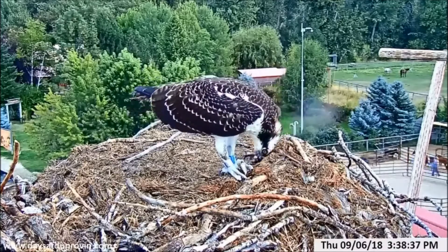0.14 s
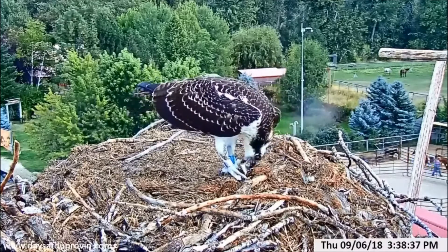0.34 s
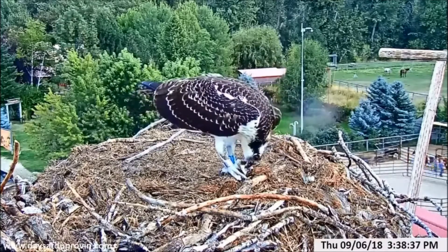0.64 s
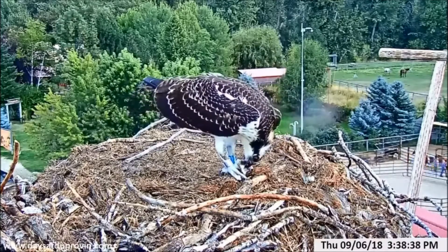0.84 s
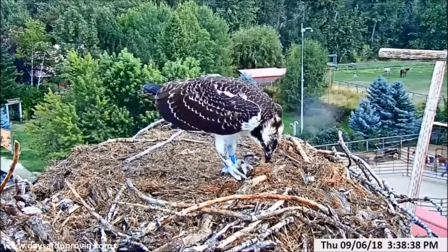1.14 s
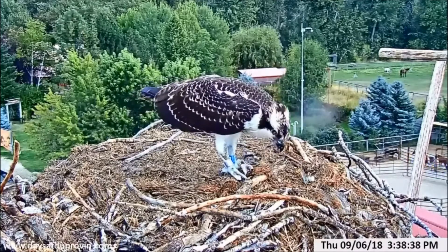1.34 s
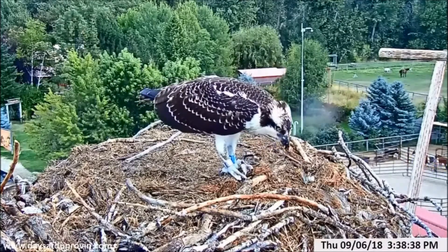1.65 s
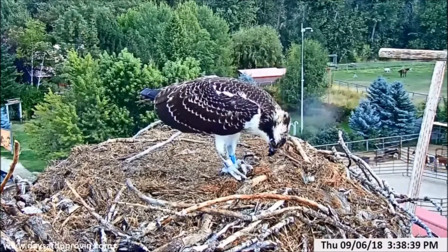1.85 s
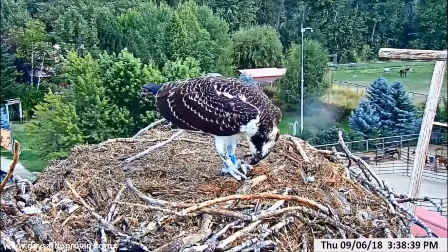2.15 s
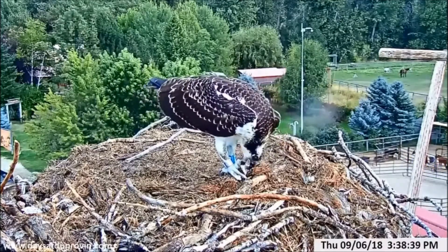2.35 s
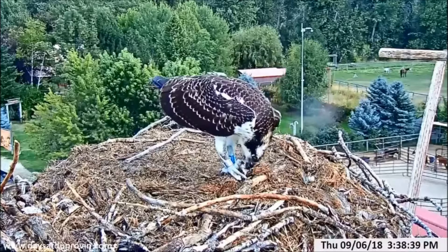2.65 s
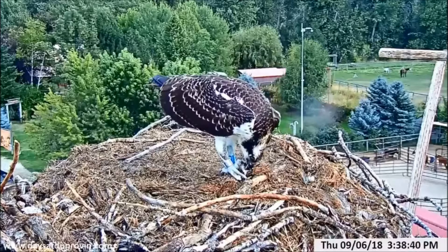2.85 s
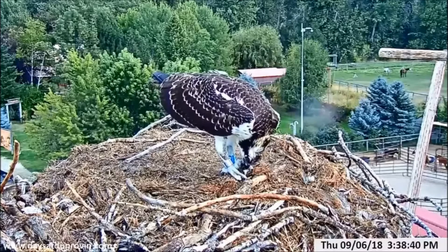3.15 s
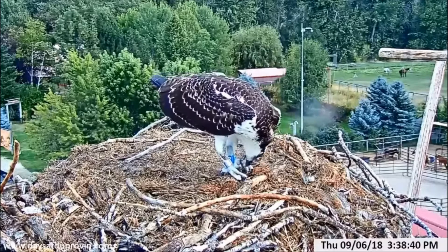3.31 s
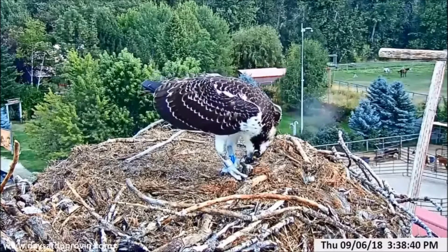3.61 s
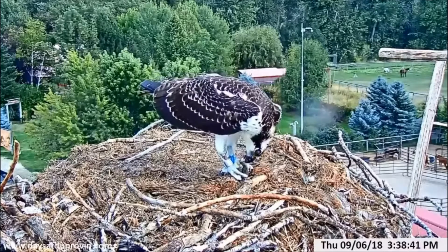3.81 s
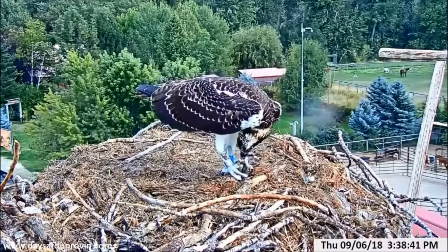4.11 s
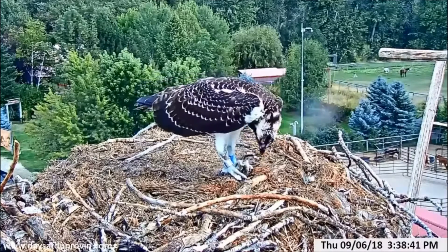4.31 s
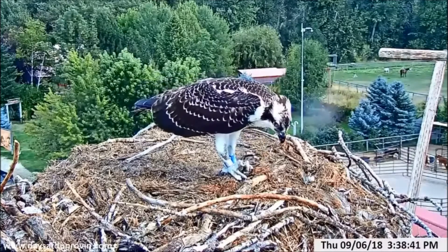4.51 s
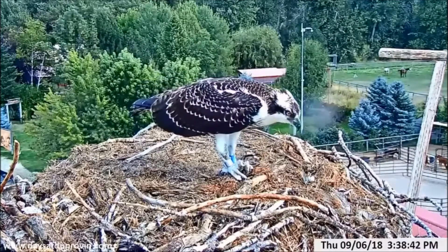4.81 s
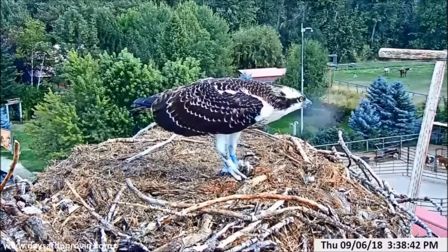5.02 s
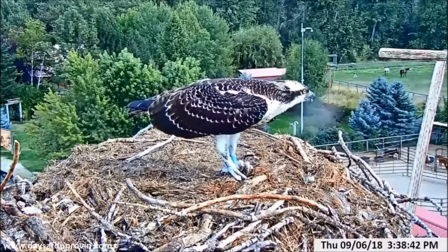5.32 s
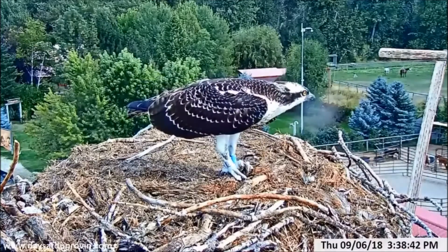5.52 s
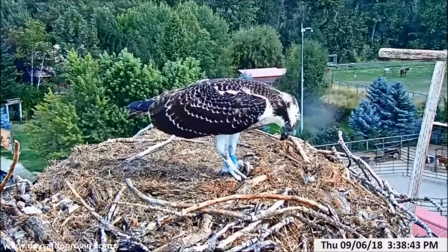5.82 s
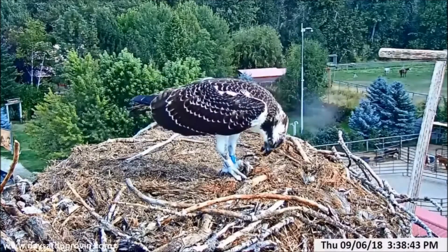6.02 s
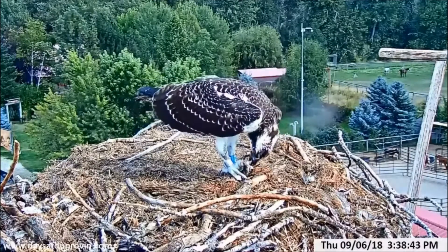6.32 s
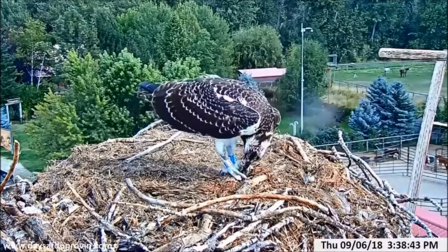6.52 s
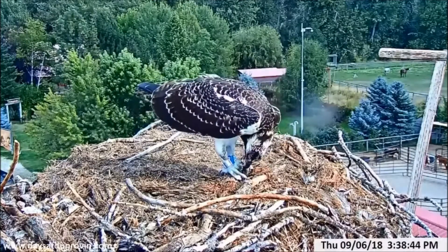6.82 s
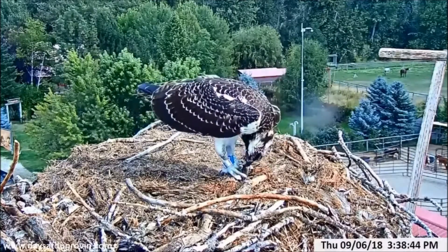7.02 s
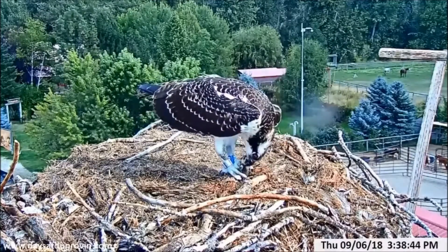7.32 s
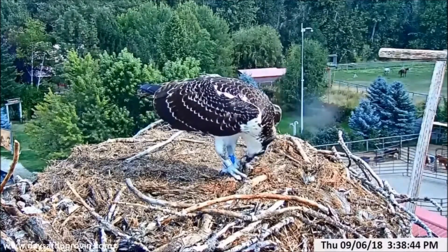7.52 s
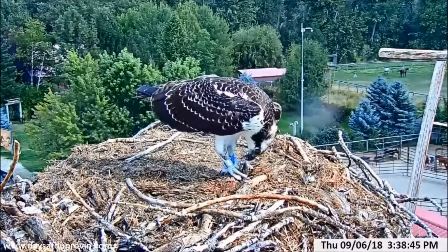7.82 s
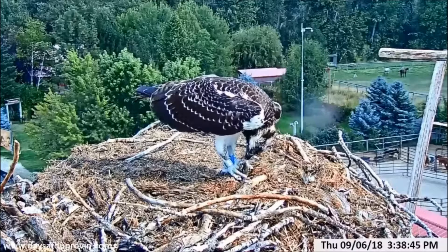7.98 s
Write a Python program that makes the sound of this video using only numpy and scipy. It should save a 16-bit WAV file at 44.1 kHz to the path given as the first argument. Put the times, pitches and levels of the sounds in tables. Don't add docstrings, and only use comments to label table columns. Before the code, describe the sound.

An osprey on its nest gives three bursts of piercing, rapid chirps, close and loud, over a faint outdoor valley hush.

```python
import sys
import numpy as np
from scipy import signal
from scipy.fft import rfft, irfft, next_fast_len
from scipy.io import wavfile
from scipy.ndimage import map_coordinates

SR = 44100
rng = np.random.default_rng(int(sys.argv[2]) if len(sys.argv) > 2 else 0)


def log_audio(samples):
    frames = np.atleast_2d(samples).T
    limited = np.clip(frames, -1, 1)
    pcm = np.round(limited * 32767).astype(np.int16)
    wavfile.write(sys.argv[1], SR, pcm)


def rack_gain(trim_db):
    fader = np.asarray(trim_db, float)
    return 10 ** (fader / 20)


N = 359415


def unit(x):
    return x / np.sqrt(np.mean(x ** 2) + 1e-20)


def along(points, hz):
    point_hz, value = np.transpose(points)
    return np.interp(np.log(hz + 1), np.log(point_hz + 1), value)


def coloured(x, spectrum):
    m = next_fast_len(x.shape[-1] + 8192)
    gain = rack_gain(along(spectrum, np.fft.rfftfreq(m, 1 / SR)))
    return irfft(rfft(x, m) * gain, m)[..., :x.shape[-1]]


def noise(spectrum):
    return unit(coloured(rng.standard_normal(N), spectrum))


def wobble(rate):
    knots = rng.standard_normal(int(N * rate / SR) + 4)
    return map_coordinates(knots, [np.arange(N) * rate / SR])


def add(track, s, piece):
    room = track[round(s * SR):][:len(piece)]
    room += piece[:len(room)]


BREAKS_UP_S = [.466, 2.695, 3.386, 6.104, 6.395, 6.611, 6.802, 7.138, 7.612]
BREAKS_DOWN_S = [.539, 2.355, 2.508, 2.764, 2.989, 3.426, 5.85, 6.247, 6.445, 6.656, 6.96, 7.643]
# pitch_ratio, level_db, loss_db per kHz of slack, upward_bend (share of pitch) before a break up
REGISTERS = [
    (1, 0.5, 4.5, .015),
    (1.335, 0, 15.5, .11),
    (1.94, -0.1, 4, 0),
]
# doubling_db, quarter_lines_db under doubling, rasp_db, bright_db
REGISTER_VOICE = [
    (-11, -21.5, -11.5, -2),
    (2, -10.5, 1, -1.5),
    (-1.5, -7, -6.8, 5.5),
]
SOFT_STARTS_S = [.43, 2.26, 2.49]
HIGH_FROM_HZ = 2000
RISE_POWER, SAG_SETS_IN_S, FALL_S = 1.7, .02, .017
END_HZ, END_FOLLOWS = 1573.4, .4
HELD_END_HZ_PER_S = 700
ATTACK_DB, ATTACK_S, SOFT_ATTACK_S = 25.5, .0017, .011
RELEASE_DB, RELEASE_S = 23.5, .005
UP_DIP_DB, DOWN_DIP_DB, DIP_S = 3.5, 9, .0035
SLIP, BEND_S = .035, .0062
TOP_BREAK = .27
LATE_BREAK_S, EARLY_DIP = .027, .15


def chirp(start, top, end, top_hz, db, first_hz, sag_hz_per_s):
    i = np.arange(round(start * SR), round(end * SR))
    t = i / SR
    ups = [s for s in BREAKS_UP_S if start < s < end]
    downs = [s for s in BREAKS_DOWN_S if start < s < end]
    register = (first_hz > HIGH_FROM_HZ) + np.searchsorted(ups, t) - np.searchsorted(downs, t)
    ratio, level_db, effort_db, push = np.transpose(REGISTERS)[:, register]

    to_climb = np.clip((top - t) / (top - start + 1e-4), 0, 1)
    rise = (top_hz - first_hz / ratio[0]) * to_climb ** RISE_POWER
    after = np.maximum(t - top, 0)
    sag = sag_hz_per_s * after ** 2 / (after + SAG_SETS_IN_S)
    drop_hz = top_hz - END_HZ - END_FOLLOWS * (top_hz - 2000) - sag[-1]
    drop_hz -= HELD_END_HZ_PER_S * (end - top) * register[-1]
    early = np.exp((top - end) / FALL_S)
    fall = np.maximum(np.exp((t - end) / FALL_S) - early, 0) / (1 - early)
    slack = rise + sag + drop_hz * fall
    hz = (top_hz - slack) * ratio

    soft = np.abs(start - np.array(SOFT_STARTS_S)).min() < .01
    attack_s = SOFT_ATTACK_S if soft else ATTACK_S
    level_db = level_db + db - effort_db * slack / 1000
    level_db -= ATTACK_DB * np.exp((start - t) / attack_s) * (start > .01)
    level_db -= RELEASE_DB * np.exp((t - end) / RELEASE_S)

    share = TOP_BREAK if register.max() > 1 else 1
    for dip_db, bend, breaks in ((UP_DIP_DB, push, ups), (DOWN_DIP_DB, -share * SLIP, downs)):
        for s in breaks:
            early_break = s in downs and end - s > LATE_BREAK_S
            depth = share * (EARLY_DIP if early_break else 1)
            level_db -= depth * dip_db * np.exp(-((t - s) / DIP_S) ** 2)
            hz *= 1 + bend * (t < s) * np.exp(-np.abs(t - s) / BEND_S)
    to_edge = np.abs(t[:, None] - [start, end, *ups, *downs]).min(axis=1)
    return i, hz, level_db, to_edge, np.transpose(REGISTER_VOICE)[:, register]


# start_s, top_s, end_s, top_hz (as low-register pitch),
# level_db
CHIRPS = [
    (0, 0.013, .023, 1650, -23.5),
    (0.017, 0.082, .124, 1905, -17),
    (0.206, 0.243, .292, 1811, -17.5),
    (0.428, 0.458, .549, 1892, -24.5),
    (0.745, 0.757, .786, 1625, -49),
    (0.785, .792, .83, 2080, -58.5),
    (0.835, 0.85, .907, 1660, -50.5),
          (2.26, 2.343, 2.398, 1925, -20), (2.47, 2.491, 2.488, 2020, -39.5),
                (2.486, 2.512, 2.542, 1810, -20), (2.646, 2.698, 2.781, 2035, -17.5),
                (2.885, 2.942, 3.006, 2030, -18), (3.144, 3.195, 3.243, 1941, -22),
                (3.334, 3.376, 3.447, 1890, -23), (3.547, 3.595, 3.654, 2030, -18),
                (3.771, 3.816, 3.868, 2013, -20), (3.969, 4.033, 4.077, 1927, -22),
                (4.177, 4.219, 4.264, 1842, -23.5),
          (5.744, 5.755, 5.761, 1857, -43),
    (5.758, 5.814, 5.867, 2047, -15.5),
    (5.929, 5.97, 6.022, 2094, -16.5),
    (6.078, 6.107, 6.263, 2059, -16.5),
    (6.357, 6.395, 6.463, 2030, -16.5),
    (6.569, 6.61, 6.674, 1947, -17),
    (6.772, 6.802, 6.974, 2042, -16.5),
    (7.109, 7.138, 7.302, 2067, -15.5),
    (7.45, 7.482, 7.672, 1898, -23),
]
ARCHES = CHIRPS
# first_hz, sag_hz_per_s, doubling_db, rasp_db, bright_db
CHIRP_VOICES = [(2030, 1000, -26.5, -26, -50), (1808, 6100, -3.5, -9.5, -17), (1665, 8900, -11.5, -19, -14),
                (1556, 1800, -33, -29, -29), (1650, 830, -5, -3, -30), (2790, 8000, -15, -9, -24),
                (1709, 380, -16, -3.5, -33),
                (2490, 7300, -27.5, -27.5, -16.5), (1750, 900, -6, -9.5, -44),
                (2380, 4000, -24.5, -18, -17), (1794, 3500, -25.5, -17, -15.5),
                (2180, 5500, -26.5, -20.5, -15), (2336, 3000, -16.5, -16.5, -19),
                (2250, 900, -19.5, -15.5, -17.5), (2535, 2500, -14, -18.5, -16.5),
                (2370, 4400, -17, -19.5, -16), (2340, 3200, -13.5, -10, -17.5), (2350, 1700, -14, -12, -17),
                (1660, 1000, -23.5, -7, -40), (2280, 3000, -29.5, -23, -14), (1660, 6600, -31.5, -25, -15),
               (1660, 41, -35, -21.5, -14.5), (1830, 3000, -32.5, -22, -12), (1711, 7400, -21, -21, -12.5),
               (1730, 800, -25.5, -17, -14.5), (1719, 970, -18, -19.5, -15), (2350, 60, -17.5, -17, -15.5)]
VOICES = CHIRP_VOICES
# pitch_hz, level_db
OCTAVE = [(1550, 6.5), (1780, 4), (1900, -1.4), (2060, -11.5), (2400, -17.5), (2560, -27.5), (2750, -31),
          (3600, -22.5)]
# freq_hz, level_db
OVERTONES = [(4500, -16), (5500, -20.5), (6500, -19.5), (7300, -1), (8200, -1), (9500, -1.5), (11000, -4.5),
             (11800, -28.5), (12300, -69)]
# freq_hz, level_db
THROAT = [(60, -42.5), (170, 4.5), (420, -20.5), (800, -13), (1400, -10), (1850, -3.5), (2400, 1),
          (3300, 3), (4000, -15), (5000, -26.5), (6600, -45.5)]
# freq_hz, level_db
BEAK = [(5000, -39.5), (6600, -21), (7900, 4), (10700, -5), (11700, -23.5), (12300, -58.5)]
# freq_hz, level_db
FLUTTER = [(150, -15.5), (500, -11), (780, 2), (1150, -16.5), (2500, -25.5), (5000, -51.5)]
FAINT_DB, OCTAVE_FADES = -18.5, .47
RASP_GROWS_DB, RASP_LIMIT_DB = .5, -13


def osprey(jitter=.002, edge_s=.0007, strain=1.5, beak_db=6, breath_db=-5):
    out = np.zeros(N)
    gusts = rack_gain(2 * wobble(45))
    breath, hiss, flutter = [noise(colour) * gusts for colour in (THROAT, BEAK, FLUTTER)]
    unsteady, doubling, patchy_db = wobble(400), wobble(35), 3.3 * wobble(30)
    for arch, (first_hz, sag, half_db, rasp_db, bright_db) in zip(ARCHES, VOICES):
        i, hz, level_db, to_edge, register_voice = chirp(*arch, first_hz, sag)
        more_half_db, under_db, more_rasp_db, more_bright_db = register_voice
        half_db = half_db + more_half_db
        quarter_db = half_db + under_db
        octave_db = along(OCTAVE, hz) + OCTAVE_FADES * min(arch[-1] - FAINT_DB, 0)
        rasp_db = rasp_db + more_rasp_db + RASP_GROWS_DB * np.linspace(-1, 1, len(i)) + patchy_db[i]
        rasp = rack_gain(np.minimum(rasp_db, RASP_LIMIT_DB))
        shake = rasp * flutter[i]
        shine_db = bright_db + more_bright_db + strain * (level_db - level_db.max())

        phase = 2 * np.pi * np.cumsum(hz * (1 + jitter * unsteady[i])) / SR
        octave = rack_gain(octave_db)
        tone = np.sin(phase) + octave * np.sin(2 * phase + 1 + 1.7 * shake)
        tone /= np.hypot(1, octave)
        for k in range(3, 8):
            tone += rack_gain(shine_db + along(OVERTONES, k * hz)) * np.sin(k * phase + k * k + shake)

        phase += shake
        tone += shake * (np.cos(phase) + .15)
        swing_db = 3.2 * doubling[i]
        tone /= np.hypot(1, 1.4 * rack_gain(half_db + swing_db))
        for q in range(1, 28):
            if q % 4 == 0:
                continue
            line_hz = q / 4 * hz
            gain = rack_gain(along(THROAT, line_hz)) + rack_gain(along(BEAK, line_hz) + shine_db + beak_db)
            gain *= rack_gain((quarter_db if q % 2 else half_db) + swing_db)
            tone += gain * np.sin(q / 4 * phase + q * q)

        air = rasp * (rack_gain(breath_db) * breath[i] + rack_gain(shine_db + 13) * hiss[i])
        fade = np.clip(to_edge / edge_s, 0, 1)
        out[i] += fade * rack_gain(level_db) * (np.sqrt(2) * tone + air)
    return out


# delay_s, level_db
WALLS = [
    (0.063, -31.5),
    (.118, -28),
    (.148, -44.5),
]
# freq_hz, t60_s
TREES = [(500, 0.34), (2500, 1.4), (5000, 2.6), (10000, 0.14)]
# freq_hz, gain_db
DISTANCE = [(300, 7), (2000, -3.5), (4500, -7), (6500, -16), (12000, -48)]


def echoes(x, trees_db=-35, blur_s=.04):
    hz, t, z = signal.stft(rng.standard_normal(SR), SR, nperseg=256)
    decay = rack_gain(-60 * t / along(TREES, hz)[:, None])
    tail = signal.istft(z * decay, SR, nperseg=256)[1][:SR]
    answer = rack_gain(trees_db) * tail / np.linalg.norm(tail)
    t = np.arange(SR // 10) / SR
    for delay, db in WALLS:
        scatter = rng.standard_normal(len(t)) * np.exp(-t / blur_s)
        add(answer, delay, rack_gain(db) * scatter / np.linalg.norm(scatter))
    return coloured(signal.fftconvolve(x, answer)[:N], DISTANCE)


# time_s, level_db
VALLEY = [(0, -56.5), (.65, -73.5), (2.9, -71.5), (3.4, -65.5), (4.2, -72), (5.8, -75), (6.15, -62),
          (6.75, -63), (7.0, -64), (8.15, -74)]
# freq_hz, density_db (per Hz)
DRONE = [(60, -40.5), (113, -7), (146, -9.5), (180, -2.5), (260, -4), (420, -18.5), (600, -47.5)]
# freq_hz, density_db (per Hz)
AIR = [(300, -21), (430, -16), (650, -7), (850, 0.5), (1450, 0), (2200, -8.5), (2700, -3), (3300, -14),
       (4600, -21.5), (8000, -25), (12000, -32.5)]
# centre_s, half_width_s, level_db
HUMS = [
    (3.4, .25, -83),
    (6.5, 0.24, -55.5),
]
DRONE_DB, DRONE_GROWS, AIR_DB = 1.5, 1.1, 4.5


def valley():
    t = np.arange(N) / SR
    loud_db = np.interp(t, *np.transpose(VALLEY))
    mean_db = loud_db.mean()
    drone_db = mean_db + DRONE_DB + DRONE_GROWS * (loud_db - mean_db)
    drone = noise(DRONE) * rack_gain(drone_db + 1.5 * wobble(12))
    air = noise(AIR) * rack_gain(loud_db + AIR_DB + 1.9 * wobble(30))
    passing = sum(rack_gain(db) * np.exp(-((t - s) / half) ** 4) for s, half, db in HUMS)
    hum = np.sin(2 * np.pi * 177 * t + .8 * wobble(15)) * passing * rack_gain(2 * wobble(14))
    return drone + air + hum


def jolts(below_db=-23):
    out, t = np.zeros(N), np.arange(SR // 10) / SR
    ring = np.sin(2 * np.pi * 172 * t) * rack_gain(-60 * t / .07)
    ring += 1.5 * np.sin(2 * np.pi * 620 * t) * rack_gain(-60 * t / .02)
    for start, top, end, top_hz, db in ARCHES:
        for s in BREAKS_UP_S:
            if start < s < end:
                add(out, s, rack_gain(db + below_db) * ring)
    return out


# time_s, peak_db, pitch_hz
TWIGS = [
    (0.771, -42.5, 4400),
    (1.744, -54.5, 3300),
    (7.885, -59, 3300),
    (8.0, -51, 2990),
    (8.02, -57, 3500),
]


def twigs():
    out, t = np.zeros(N), np.arange(SR // 50) / SR
    for s, db, hz in TWIGS:
        ping = np.sin(2 * np.pi * hz * t) + .18 * rng.standard_normal(len(t))
        add(out, s, rack_gain(db - 60 * t / .015) * ping)
    return out


# start_s, length_s, pitch_hz, level_db
CAWS = [
    (1.5, 0.15, 418, -64.5),
    (1.83, 0.13, 420, -69.5),
    (4.61, 0.13, 426, -64),
    (4.92, 0.15, 409, -68.5),
    (7.72, 0.067, 425, -65.5),
]
# freq_hz, level_db
CROW = [(400, -37), (860, 9), (1300, 2), (1700, -6), (2150, 10.5), (2700, -18), (3500, -22)]


def crow():
    out = np.zeros(N)
    for s, length, hz, db in CAWS:
        u = np.linspace(0, 1, round(length * SR))
        bend = 1 - .25 * (u - .5) ** 2 + .03 * wobble(60)[:len(u)]
        phase = 2 * np.pi * np.cumsum(hz * bend) / SR
        stack = sum(np.cos(k * phase) for k in range(1, 9))
        hoarse = stack * (1 + 1.6 * rng.standard_normal(len(u)))
        add(out, s, rack_gain(db) * unit(coloured(hoarse, CROW)) * np.sin(np.pi * u))
    return out


# time_s, peak_db
CLICKS = [(2.878, -22), (3.132, -33), (3.327, -30.5), (3.537, -33), (3.761, -31.5), (3.957, -41),
          (4.167, -35.5), (5.922, -26), (6.073, -23.5), (6.347, -24), (6.561, -19), (6.766, -20.5),
          (7.102, -23.5), (7.439, -47)]
# freq_hz, level_db, t60_s
CLICK_MODES = [
    (1640, -2, 0.022),
    (3300, 2.5, 0.013),
    (5380, -15.5, 0.0062),
]


def clicks():
    out, t = np.zeros(N), np.arange(SR // 30) / SR
    onset = (1 - np.exp(-t / .00063)) ** 2
    for s, db in CLICKS:
        ring = np.zeros(len(t))
        for hz, mode_db, t60 in CLICK_MODES:
            ring += rack_gain(mode_db + rng.normal(0, 2.4) - 60 * t / t60) * np.sin(2 * np.pi * hz * t)
        add(out, s, rack_gain(db + 2) * ring * onset)
    return out


def scene():
    bird = osprey() + clicks()
    mono = bird + echoes(bird) + jolts() + twigs() + crow() + valley()
    return np.array([mono, mono])


def band_limit(x):
    return signal.sosfilt(signal.butter(12, 12190, fs=SR, output="sos"), x)


def record(dry, top=.36, knee=4):
    rounded = dry / (1 + np.abs(dry / top) ** knee) ** (1 / knee)
    return band_limit(coloured(rounded, [(25, -31), (80, -0.5), (11600, 0.5), (12100, -43)]))


dry = scene()
out = record(dry)
log_audio(out)
```